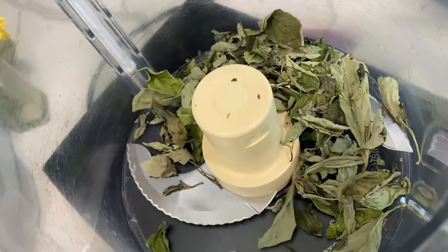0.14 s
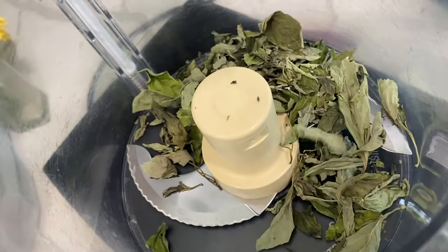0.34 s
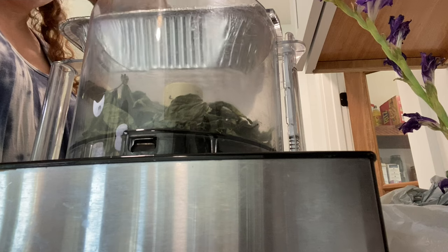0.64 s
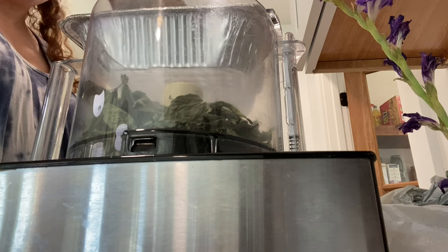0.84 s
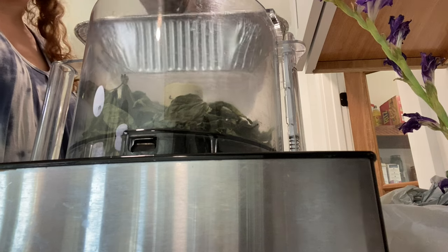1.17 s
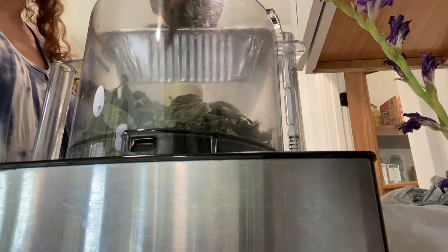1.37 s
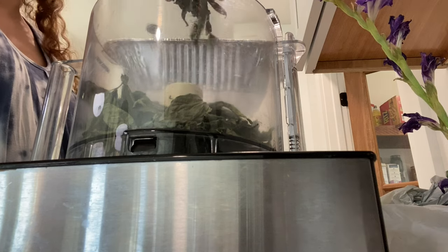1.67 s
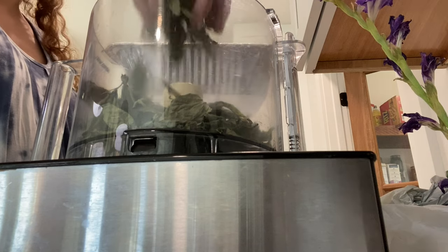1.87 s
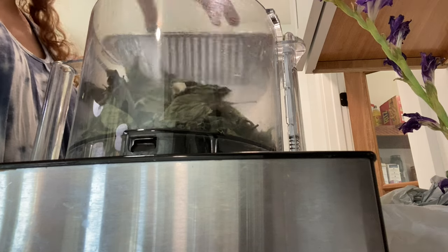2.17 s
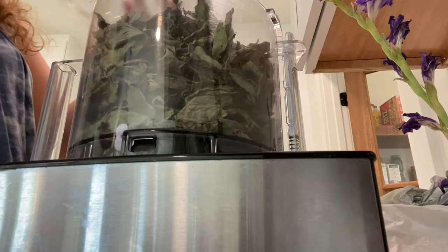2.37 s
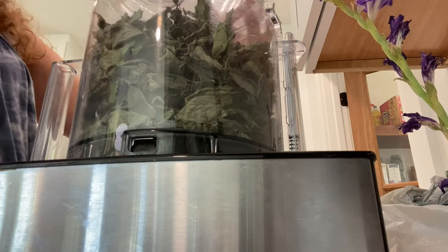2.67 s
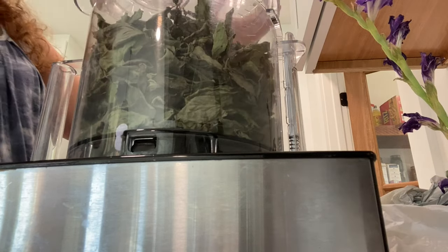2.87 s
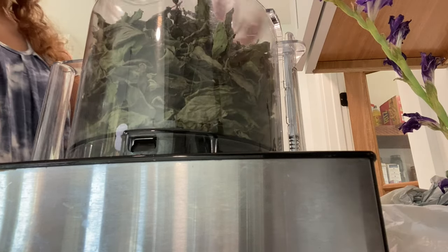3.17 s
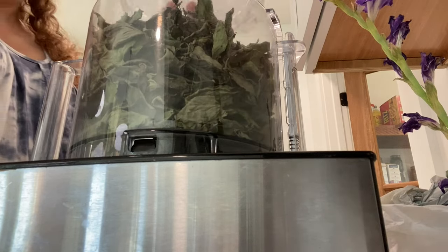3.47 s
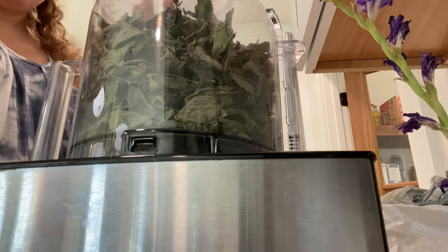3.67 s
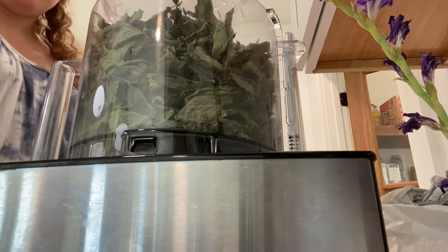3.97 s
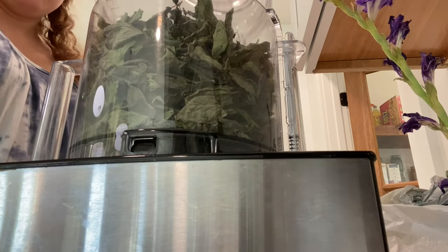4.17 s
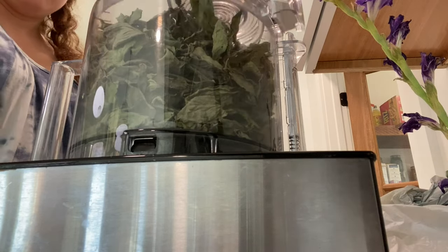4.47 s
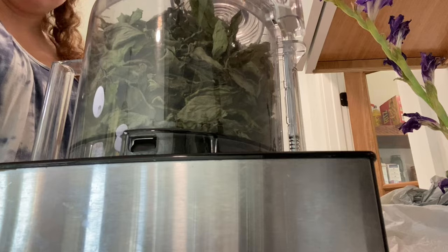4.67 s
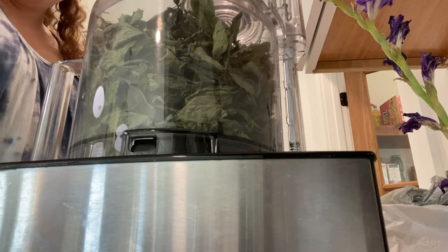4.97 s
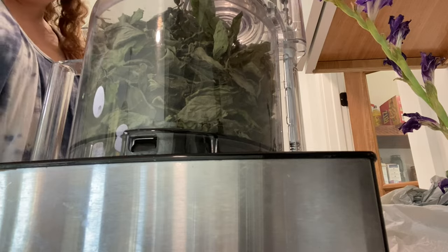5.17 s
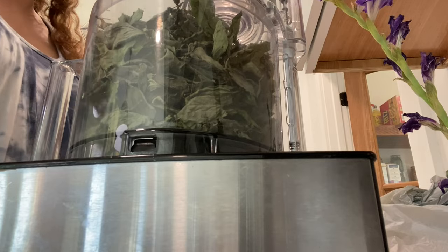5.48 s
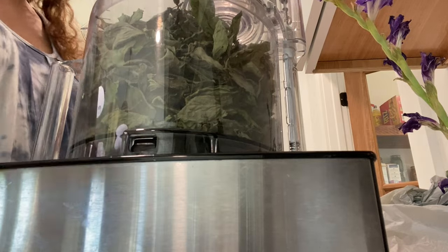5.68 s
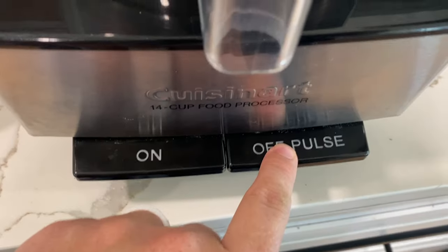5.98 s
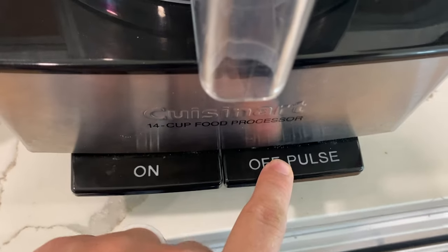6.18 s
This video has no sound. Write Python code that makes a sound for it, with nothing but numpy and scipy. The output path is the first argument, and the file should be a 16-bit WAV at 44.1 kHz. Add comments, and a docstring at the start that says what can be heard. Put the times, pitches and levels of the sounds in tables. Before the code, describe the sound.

Close stereo sound in a kitchen with low rumble and faint hum. Brittle leaves crackle nearby, then slide in several papery rushes from a foil pan into a hollow plastic bowl, with light bumps. The pour stops abruptly. A hand crunches the heap softly while a lid knocks further off. The lid rattles on the rim, snaps shut sharply, rubs briefly, and a button clicks. No motor runs.

```python
"""Close stereo take at a food processor in a kitchen: low rumble, hum and faint hiss; no motor runs.
Dry leaves (bursts of tiny fractures) settle close by, then slide tip by tip from a foil pan into the bowl.
The pouring breaks off abruptly; a hand presses the heap (crunch, ticks, stems), while the lid knocks further off.
The lid grazes the leaves, rattles (struck modes and noise bursts), chatters round the rim and snaps shut.
It rubs on briefly; last, a hand brushes up and clicks a button."""
import sys
import numpy as np
from scipy import signal
from scipy.fft import rfft, irfft
from scipy.io import wavfile
from scipy.ndimage import uniform_filter1d, minimum_filter1d, map_coordinates

SR = 44100
rng = np.random.default_rng(int(sys.argv[2]) if len(sys.argv) > 2 else 0)


def unload_wav(signal):
    """Save mono or channel-first audio to the path in sys.argv[1] as 16-bit WAV at rate SR, clipped to [-1, 1]."""
    wavfile.write(
        sys.argv[1],
        SR,
        np.round(np.clip(np.atleast_2d(signal).T, -1, 1) * 32767).astype(np.int16),
    )


N = 278712
T = np.arange(N) / SR
RING = T[:SR // 4]  # time axis of one blow

# In all tables, levels are relative: each layer is trimmed where it is mixed.
# spectrum of leaves crushed in the heap: (frequency [Hz], density [dB per Hz])
PRESS_COLOUR = [(400, -16), (700, -17.5), (1000, -5), (1400, -8.5), (2300, -9), (2900, -6), (4100, -14),
                (5200, -25.5), (6600, -23.5), (9000, -38), (12000, -71.5)]
# spectrum of a knock on the plastic wall: (frequency [Hz], density [dB per Hz])
WALL_COLOUR = [(200, -37), (600, 2), (850, 5), (1150, 3.5), (1400, -2), (1620, 0), (2200, -0.5), (2600, 1),
               (3400, -5.5), (4300, -15), (5200, -24.5), (8000, -41), (11000, -63)]
# treble loss of the leaf ticks: (frequency [Hz], gain [dB])
LEAF_ROLL_OFF = [(4000, -2.5), (7500, -2), (9500, -12.5), (12000, -57)]
# resonances of the bowl with the leaves in it: (frequency [Hz], width [Hz], lift [dB])
HEAP = [(649, 29, 0.5), (1230, 55, 0), (1460, 28, -3), (1872, 65, -7.5), (2080, 110, -11.5), (2668, 110, 0),
        (3110, 180, -3.5), (3960, 47, -7)]


def undb(db):
    """Decibels to gain."""
    return 10 ** (np.asarray(db) / 20)


def unit(x):
    """Scale to rms 1."""
    return x / np.sqrt(np.mean(x ** 2))


def strength(x):
    """Scale a blow so that its loudest 5 ms have rms 1."""
    power = np.mean(x ** 2, axis=0)
    return x / np.sqrt(uniform_filter1d(power, size=220).max())


def pan(db):
    """Left and right gains for a level difference; positive favours the left."""
    return undb(np.array([[db], [-db]]) / 2)


def add(out, s, sound):
    """Mix a sound in at a time in seconds."""
    start = max(int(s * SR), 0)
    out[:, start:start + sound.shape[1]] += sound[:, :N - start]


def colour(x, points):
    """Causal minimum-phase filter whose gain follows the given (Hz, dB) curve."""
    hz, db = np.transpose(points)
    size = 8192
    bins_hz = np.arange(size // 2 + 1) * SR / size + 1
    log_gain = np.log(undb(np.interp(np.log(bins_hz), np.log(hz), db)))
    # folding the cepstrum onto positive times makes the response causal
    cepstrum = irfft(log_gain)
    cepstrum[1:size // 2] *= 2
    cepstrum[size // 2 + 1:] = 0
    response = irfft(np.exp(rfft(cepstrum)))
    return signal.fftconvolve(x, response[None], axes=1)[:, :x.shape[1]]


def noise(count, alike):
    """White noise at two microphones that share a part of its power (alike, 0 to 1)."""
    shared, own = rng.standard_normal(count), rng.standard_normal((2, count))
    alike = np.clip(alike, 0, 1)
    return np.sqrt(alike) * shared + np.sqrt(1 - alike) * own


def fade(t, t60):
    """Exponential decay by 60 dB in t60 seconds."""
    return np.exp(-np.log(1000) * t / t60)


def ring(modes, rise_s, scatter):
    """Struck modes that swell briefly; each blow weights them anew, phases differ at the two sides."""
    out = 0
    for hz, db, t60 in modes:
        detune, phase, weight, left, right = rng.standard_normal(5)
        side_phase = scatter * (phase + np.array([[left], [right]]) / 2)
        angle = 2 * np.pi * hz * (1 + .003 * detune) * RING + side_phase
        out = out + undb(db + weight) * fade(RING, t60) * np.sin(angle)
    swell = 1 - np.exp(-(RING / rise_s) ** 2)
    return strength(out * swell)


def crack(points, t60, tail_db, tail_t60):
    """A contact: a burst of crowded, quickly dying vibrations with a weaker tail."""
    shape = fade(RING, t60) + undb(tail_db) * fade(RING, tail_t60)
    return strength(colour(noise(len(RING), 0.41) * shape, points))


def grains(rate, spread_db, t60, alike=0.21):
    """Countless tiny fractures, rate per second on average, a few much bigger than the rest."""
    size = undb(spread_db * np.minimum(rng.exponential(size=N), 5))
    power = (rng.random(N) < rate / SR) * size ** 2
    power = signal.lfilter([1], [1, -fade(1 / SR, t60) ** 2], power) + 1e-12
    # dividing by the local mean power (79 ms) leaves the loudness to the movements
    power = power / uniform_filter1d(power, size=3500)
    return np.sqrt(np.abs(power)) * noise(N, alike)


def stroke(start, length, db, sag_db_per_s, attack_s, release_t60):
    """Level of one movement: it builds up, sags (or swells) while it lasts, then dies away."""
    t = np.maximum(T - start, 0)
    level = undb(db - sag_db_per_s * np.minimum(t, length))
    return level * np.minimum(t / attack_s, 1) * fade(np.maximum(t - length, 0), release_t60)


def strokes(table, attack_s, release_t60):
    """Level of a run of movements; their powers sum."""
    return np.sqrt(sum(stroke(*row, attack_s, release_t60) ** 2 for row in table))


def ticks(level, per_s, low_hz, high_hz, t60, spread_db):
    """Separate tiny contacts at random moments, each with its own pitch, size and place."""
    out, t = np.zeros((2, N)), T[:SR // 25]
    for when, pitch, size, side in rng.random((int(per_s * N / SR), 4)):
        hz = min(low_hz * (high_hz / low_hz) ** pitch, SR / 4)
        burst = noise(len(t), 0.48) * fade(t, t60)
        tick = strength(signal.lfilter(*signal.iirpeak(hz, 2, fs=SR), burst))
        gain = level[int(when * N)] * undb(-spread_db * size)
        add(out, when * N / SR, gain * tick * pan(8 * (side - .5)))
    return out


def resonate(x, peaks):
    """Lift the given resonances (Hz, width Hz, dB) out of a sound."""
    return x + sum(undb(db) * signal.lfilter(*signal.iirpeak(hz, hz / width, fs=SR), x)
                   for hz, width, db in peaks)


def from_side(x, lag_s):
    """Sound reaches one microphone late: a positive lag delays the left, a negative the right."""
    late = T[:x.shape[1]]
    lag = np.round(lag_s * SR) / SR
    return np.array([np.interp(late - np.maximum(sign * lag, 0), late, ear, left=0)
                     for sign, ear in zip([1, -1], x)])


def flicker(x, depth_db, hold_s, width_hz):
    """Every fragment rings at its own pitches, so narrow bands flare up and die away independently."""
    size = 1024
    spectra = signal.stft(x, nperseg=size, noverlap=size * 3 // 4)[2]
    field = rng.standard_normal(spectra.shape[1:])
    # smooth the random field along frequency, then along time
    for axis, step in enumerate([SR / size / width_hz, size / 4 / SR / hold_s]):
        for order in range(2):
            field = signal.lfilter([1], [1, -np.exp(-step)], field, axis=axis)
    gain = unit(undb(depth_db * np.clip(unit(field), -2, 2)))
    return signal.istft(spectra * gain, nperseg=size, noverlap=size * 3 // 4)[1][:, :x.shape[1]]


def background():
    """Low kitchen rumble, a mains hum and faint hiss: two coloured noises and a sine."""
    # kitchen loudness: (time [s], level [dB])
    room_level = [(0, -59), (.55, -59.5), (.7, -71), (2.3, -71), (2.55, -67.5), (4.2, -71.5), (5.4, -58.5),
                  (5.8, -61), (6.32, -55.5)]
    # spectrum of the rumble: (frequency [Hz], density [dB per Hz])
    room_colour = [(20, -31), (30, -16), (50, -6), (90, -6), (200, -10), (420, -9), (780, -24.5),
                   (1150, -34), (1800, -30.5), (2800, -41.5), (12000, -56.5), (16000, -78)]
    # spectrum of the hiss: (frequency [Hz], density [dB per Hz])
    hiss_colour = [(100, -1), (1000, 5.5), (3000, -3.5), (5000, -5.5), (9000, -5), (10500, -14.5),
                   (16000, -17)]
    level = undb(np.interp(T, *np.transpose(room_level)))
    hum = undb(-5) * np.sin(2 * np.pi * 59.5 * T)
    rumble = undb(-3.0) * unit(colour(noise(N, 0.13), room_colour))
    hiss = undb(-80.0) * unit(colour(noise(N, 0.091), hiss_colour))
    return level * (rumble + hum) + hiss


def kitchen(x, wet_db, low_t60, mid_t60, high_t60):
    """Hard counters and cupboards return a diffuse tail: noise bands with decays set by pitch."""
    t, tail = T[:SR], 0
    edges = [100, 350, 700, 1500, 3000, 5500, 8000, 15000]  # Hz
    for lo, hi in zip(edges, edges[1:]):
        t60 = np.interp(np.log(lo * hi) / 2, np.log([300, 2000, 9000]), [low_t60, mid_t60, high_t60])
        band = signal.butter(3, [lo, hi], "band", fs=SR, output="sos")
        tail = tail + signal.sosfilt(band, noise(SR, 0.095)) * fade(t, t60)
    tail = tail * (1 - np.exp(-(t / 0.0014) ** 2))
    tail = tail / np.sqrt(np.sum(tail ** 2) / 2)
    surfaces = [(150, 4.0), (450, 0.0), (1000, -1.5), (3000, -3.0), (7000, 1.0), (10000, -6.0)]  # Hz, dB
    return undb(wet_db) * signal.fftconvolve(x, colour(tail, surfaces), axes=1)[:, :N]


def button():
    """A hand brushes up to the button, which takes up its play, then clicks."""
    # spectrum of the click: (frequency [Hz], density [dB per Hz])
    button_colour = [(88, -44), (150, -31), (431, 5.5), (624, -30.5), (960, -12), (1120, -34), (1390, -3.5),
                     (1720, -15.5), (2450, -11.5), (3420, -4.5), (5150, -24.5), (8070, -10.5),
                     (9440, -25.5), (16000, -20)]
    brush_colour = [(300, -19.5), (900, 2), (1400, -9.5), (2000, 4.5), (2600, -12), (6000, -16),
                    (12000, -30.5)]
    brush = unit(colour(grains(900, 1.7, .015), brush_colour))
    out = stroke(5.98, .13, -80.5, -44.5, 0.06, 0.36) * brush  # swells as it nears
    add(out, 6.2888, undb(-45.5) * crack(WALL_COLOUR, 0.11, -21.0, 0.1))  # play
    add(out, 6.293, undb(-33) * crack(button_colour, 0.031, -21, 0.23))  # click
    return out * pan(1.2)


def rocking():
    """Hard blows jolt the whole machine, which rocks on its rubber feet: slow modes at 40 to 70 Hz."""
    # the machine jolted on its feet: (time [s], level [dB])
    jolts = [(4.36, -42.5), (4.47, -39), (4.83, -56), (4.994, -30.5)]
    feet_modes = [(40, -5.5, 0.28), (45, -3.5, 0.42), (70, -4.5, 0.17)]  # Hz, dB, t60 s
    out = np.zeros((2, N))
    for s, db in jolts:
        add(out, s, undb(db) * ring(feet_modes, 0.033, .3))
    return out


def lid_lifted():
    """The loose lid knocks with a hollow note, then grazes the leaves as it is brought over."""
    # the lid knocking as it is picked up: (time [s], level [dB])
    knocks = [(3.076, -51.5), (3.116, -40.5), (3.167, -42.5), (3.178, -24.5)]
    # modes of the loose lid: (frequency [Hz], level [dB], t60 [s])
    loose_lid = [(686, 1, 0.1), (838, 1, 0.075), (930, 1, 0.11), (1052, 2, 0.065), (2779, -13, 0.06)]
    # the lid grazing the leaves: (start [s], length [s], level [dB], sag [dB per s]; negative = swelling)
    graze_move = (3.835, 0.065, -54, -85)
    # resonances of that graze: (frequency [Hz], width [Hz], lift [dB])
    graze_peaks = [(964, 40, 8), (1830, 60, 8), (2120, 60, 10), (2730, 70, 14), (3060, 130, 12),
                   (3500, 200, 7), (3910, 110, 16), (4430, 110, 13)]
    thunk = [(100, -33), (570, -31), (690, -19.5), (900, -7), (1060, -9), (1350, -23), (1800, -21.5),
             (3000, -30.5), (4200, -42.5), (8000, -47.5), (12000, -83)]
    out = np.zeros((2, N))
    for s, db in knocks:
        note = ring(loose_lid, 0.00145, 0.79)
        knock = strength(note + undb(1) * crack(thunk, 0.017, 0, 0.16))
        add(out, s, undb(db - 4.5) * knock)
    graze = unit(resonate(colour(grains(320, 2.4, .008), PRESS_COLOUR), graze_peaks))
    out = out + stroke(*graze_move, 0.02, 0.13) * graze
    return from_side(out, 0.00029) * pan(2.0)


def latch():
    """The tab pings at its catch, snaps past and rings the locked lid, which seats with a dead thump."""
    # modes of the tab, the locked lid and its seat: (frequency [Hz], level [dB], t60 [s])
    tab_modes = [(1460, -0.5, 0.055), (3440, 4.5, 0.079), (4460, -6.5, 0.045), (5420, -12.5, 0.042)]
    catch_modes = [(613, -2, .06), (750, 0, .06), (938, 0, .055), (1134, -4, .045), (1310, 2, .04),
                   (1428, 2, .045), (2190, -3, .04), (2530, -9, .04), (3000, -8, .035), (3350, -2, .025),
                   (3560, -8, .025)]
    seat_modes = [(300, -6, 0.04), (388, 0.5, 0.061), (450, -1.5, 0.021), (506, 6, 0.067), (568, -4, 0.035),
                  (745, -4, 0.022)]
    out = np.zeros((2, N))
    add(out, 4.786, undb(-31) * ring(tab_modes, 0.0005, 1.0) * pan(5))
    add(out, 4.9852, undb(-9.5) * ring(catch_modes, 0.0008, 0.6) * pan(2))
    add(out, 4.9925, undb(-12) * ring(seat_modes, 0.004, 0.25) * pan(-2.5))
    return from_side(out, .00018)


def lid_fitted():
    """Blows tick and ring walls, lid and body, the rim chatters; returns near wall, sound to the room."""
    # the lid striking the bowl:
    # (time [s], wall ring [dB], lid ring [dB], body thud [dB], sharp edge [dB])
    blow_table = [(4.28, -49.5, -54, -27, -58), (4.292, -55, -59.5, -35.5, -72.5),
                  (4.319, -34, -40, -26.5, -54), (4.335, -48, -45.5, -25.5, -76),
                  (4.356, -25.5, -34, -27, -43.5), (4.361, -28.5, -24.5, -14, -50.5),
                  (4.385, -35, -31, -37.5, -54), (4.408, -45.5, -41, -30.5, -66),
                  (4.4375, -27, -28.5, -33, -61), (4.466, -22, -24.5, -19.5, -54.5),
                  (4.469, -26, -18.5, -20.5, -63), (4.567, -39.5, -48.5, -40.5, -63.5),
                  (4.593, -44, -53, -35, -69), (4.6285, -46.5, -51.5, -46.5, -66.5),
                  (4.699, -31.5, -37.5, -35.5, -55.5), (4.706, -41.5, -43.5, -29.5, -64.5),
                  (4.744, -47, -49.5, -40.5, -65), (4.786, -26.5, -37.5, -31, -39),
                  (4.797, -41.5, -34, -29.5, -64), (4.812, -41.5, -38, -30, -65.5),
                  (4.829, -37.5, -34, -23.5, -60.5), (4.838, -37.5, -36, -22.5, -60),
                  (4.853, -43.5, -31.5, -28, -65.5), (4.873, -50, -40.5, -34, -72.5),
                  (4.9648, -32, -41, -32, -52.5), (4.984, -12.5, -34.5, -35, -15),
                  (4.9865, -12, -31, -31, -21), (4.994, -20, -22, -21, -37), (5.282, -59, -35.5, -42, -80),
                  (5.305, -39.5, -47, -36.5, -69), (5.3279, -43, -35.5, -36.5, -75),
                  (5.36, -56, -58, -34, -74.5), (5.3889, -34, -34, -31, -54)]
    # twists of the lid round the rim: (start [s], length [s], level [dB], sag [dB per s])
    twists = [(4.278, 0.1, -42.5, -3.5), (4.36, 0.14, -35, 7.5), (4.56, 0.21, -46, 27.5),
              (4.72, 0.082, -43, -1), (4.785, 0.053, -33, 15), (4.87, 0.18, -46.5, 0),
              (4.97, 0.053, -36.5, 1), (5.12, 0.17, -51.5, -4), (5.26, 0.15, -45.5, 9)]
    # modes of the lid on the rim and of the heavy body: (frequency [Hz], level [dB], t60 [s])
    lid_on_rim = [(700, 0, .075), (765, -1, .06), (985, -6, .085), (1085, -10, .07), (1165, -5, .07),
                  (1890, -16, .06), (2040, -13, .06), (2190, -13, .06), (2460, -17, .05), (2900, -20, .05)]
    body_modes = [(136, -10.5, 0.07), (176, -13, 0.045), (245, -11, 0.05), (332, -2, 0.09), (385, -5, 0.05),
                  (418, -6, 0.05), (461, -2, 0.031), (513, -6.5, 0.031), (690, -10, 0.055)]
    # spectra of the sharp edge and of the rubbing rim: (frequency [Hz], density [dB per Hz])
    edge_colour = [(2000, -15), (3500, 6), (5000, -10), (5700, -7), (6600, -4.5), (7500, -11.5), (8500, -9),
                   (9600, -25.5), (11500, -61), (16000, -80)]
    rub_colour = [(25, -11), (45, 1), (90, -22), (140, 3), (210, -6.5), (270, -6), (350, 3), (450, -0.5),
                  (650, -28), (1000, -22), (1600, -28.5), (3000, -26), (6800, -41.5), (12000, -70)]
    # ringing of the plastic walls and lid: (frequency [Hz], width [Hz], lift [dB])
    plastic = [(514, 36, 10), (611, 30, 11), (754, 38, 6.5), (938, 30, 6.5), (1140, 40, 4), (1309, 45, 7.5),
               (1429, 40, 9.5), (1620, 24, 1), (2040, 50, 4.5), (2207, 55, 6.5), (2529, 30, 2),
               (3000, 45, 4), (3370, 130, 4), (3730, 45, 1.5), (4409, 45, 3), (6500, 300, 4.5),
               (7330, 100, 3)]
    # what all walls together send into the room: (frequency [Hz], gain [dB])
    all_walls = [(250, -0.5), (550, 7), (780, 6.5), (1350, 8.5), (3000, 1.5), (7000, 5), (10000, -2.5)]
    twist = strokes(twists, attack_s=0.019, release_t60=0.19)
    rub = twist * unit(colour(grains(520, 0.96, 0.035), rub_colour)) * undb(-0.5)
    contact, lid, body = np.zeros((3, 2, N))
    for s, wall_db, lid_db, thud_db, edge_db in blow_table:
        add(lid, s, undb(lid_db - 3.5) * ring(lid_on_rim, 0.0015, 0.66))
        add(contact, s, undb(wall_db - 5.5) * crack(WALL_COLOUR, 0.04, -30, 0.11) * pan(2))
        add(contact, s, undb(edge_db - 3.5) * crack(edge_colour, 0.054, -26.0, .1) * pan(6.0))
        add(body, s, undb(thud_db - 3.5) * ring(body_modes, 0.0046, 0.92) * pan(-1.2))
    chatter = colour(ticks(twist, 100, 600, 3600, .012, 12), WALL_COLOUR) * undb(-3.5)
    blows = contact + chatter + flicker(rub, 3, .015, 50)
    ringing = from_side(body, .0005) + from_side(lid, .00028)
    walls = resonate(blows, plastic)
    near = from_side(walls, 0.00017) + ringing
    # the room hears a smoother sum of all walls
    radiated = undb(-1.0) * colour(blows, all_walls) + undb(-11.5) * walls + undb(-1.5) * ringing
    return near, radiated


def settling():
    """Crisp leaves shift in the bowl right under the microphone: slumps of fractures, single cracks."""
    # the heap slumping close by:
    # (start [s], length [s], level [dB], sag [dB per s]; negative = swelling)
    slumps = [(0.0, 0.08, -36, 104), (0.108, 0.077, -45.5, 168), (0.225, 0.088, -62.5, -26),
              (0.34, 0.033, -56, -280), (0.466, 0.058, -53, 132)]
    # single leaves cracking close by: (time [s], level [dB])
    cracks = [(0.0308, -33), (0.1012, -28.5), (0.2702, -48), (0.362, -45.5), (0.4417, -51), (0.468, -43),
              (0.5627, -44)]
    # spectrum of leaves under the microphone: (frequency [Hz], density [dB per Hz])
    settle_colour = [(300, -52), (1200, -15.5), (2500, -9), (4000, -7.5), (7000, -5), (9000, -11.5),
                     (11500, -2.5), (15500, -3)]
    rustle = unit(colour(grains(1200, 1.8, .02), settle_colour))
    out = strokes(slumps, attack_s=0.00065, release_t60=0.11) * rustle * undb(-1.0)
    out = flicker(out, 3, .01, 250)
    for s, db in cracks:
        add(out, s, undb(db - 3.5) * crack(settle_colour, .016, -32, .06))
    return out * pan(2.9)


def pressing():
    """The heap crunches under a hand, then the lid; leaves tick and single stems snap."""
    # a hand, then the lid, pushing on the heap:
    # (start [s], length [s], level [dB], sag [dB per s]; negative = pushing ever harder)
    pushes = [(2.44, 0.23, -66.5, -21), (2.572, 0.037, -55, -67), (2.66, 1, -60, 46),
              (3.08, 0.17, -63.5, -18), (3.28, 0.25, -69, 45), (3.62, 0.27, -67.5, 16),
              (3.81, 0.096, -72, -130), (4.258, 0.027, -51, -4)]
    # stems snapping under the hand: (time [s], level [dB])
    stems = [(2.5266, -35.5), (2.588, -52), (2.623, -49), (2.678, -53), (2.734, -47), (3.117, -37.5),
             (3.193, -38), (3.32, -50.5), (3.59, -50), (3.6663, -46), (3.738, -58), (3.822, -59),
             (3.859, -58)]
    push = strokes(pushes, attack_s=0.012, release_t60=0.13)
    out = push * unit(colour(grains(900, 1.9, .02), PRESS_COLOUR)) * undb(-3)
    out = out + colour(ticks(push, 60, 1200, 6000, .014, 12), LEAF_ROLL_OFF) * undb(3)
    for s, db in stems:
        add(out, s, undb(db - 10.5) * crack(PRESS_COLOUR, 0.032, -14, 0.11))
    out = flicker(resonate(out, HEAP), 4, .016, 70)
    return out * pan(4.0)


def pour_levels():
    """Each tip of the pan sends down leaves, stirs the air and sheds flakes, all with one envelope."""
    # tips of the pan: (start [s], length [s], level [dB], sag [dB per s],
    # bowl air [dB], fine flakes [dB]), the last two relative to the level
    tips = [(0.57, 0.12, -39.5, -8, 6.5, -9.5), (0.708, 0.35, -45, 2, 6, -8.5),
            (1.106, 0.43, -53.5, 3, 9, -3.5), (1.559, 0.14, -55, 35, 7, -2.5),
            (1.74, 0.42, -75, -21, -7, 8.5), (1.961, 0.28, -54.5, 27, -1.5, -1.5),
            (2.287, 0.2, -54.5, 27, -12, -7.5)]
    attack_s, release_t60 = 0.024, 0.32
    power = 0
    for start, length, db, sag, air_db, flake_db in tips:
        envelope = stroke(start, length, db, sag, attack_s, release_t60)
        power = power + np.outer(undb([0, air_db, flake_db]), envelope) ** 2
    return np.sqrt(power)


def pouring():
    """Leaves scrape and tick down the foil and stir the air in the bowl; the pan bumps the rim."""
    # clumps of leaves dropping into the bowl: (time [s], level [dB], fine flakes [dB])
    clumps = [(0.582, -53, -62), (0.604, -41, -60), (0.623, -34.5, -78), (0.69, -56, -44),
              (0.819, -37.5, -60), (0.875, -59, -63), (1.006, -50, -43.5), (1.141, -44.5, -69),
              (1.321, -63, -69), (1.411, -50.5, -65), (1.455, -50, -71), (1.573, -45.5, -58),
              (1.595, -43, -55), (1.617, -45, -56), (1.671, -42.5, -62), (1.69, -58, -55),
              (1.823, -54, -48), (1.881, -55.5, -50), (1.888, -55, -62), (1.935, -71, -47.5),
              (1.989, -56, -39), (2.013, -47, -49)]
    # the pan bumping the bowl: (time [s], level [dB], pitch [ratio])
    bumps = [(0.59, -37, 0.86), (0.618, -37, 1), (0.684, -45.5, 1.06), (0.718, -42, 0.98),
             (0.828, -48.5, 0.93), (0.87, -48.5, 0.91), (1.004, -35, 0.99), (1.045, -43, 0.96),
             (1.32, -47, .96), (1.373, -44, 1.05), (1.452, -46, 1.03), (1.573, -42.5, 1), (1.67, -46, 1),
             (1.986, -43.5, 1.02), (2.051, -51, 1.08), (2.177, -54, 0.91), (2.209, -54, 0.83),
             (2.336, -24, .98), (2.357, -33, 0.92), (2.399, -40, 1.1), (2.426, -39.5, 1.03)]
    # spectra of the sliding leaves and of the fine flakes: (frequency [Hz], density [dB per Hz])
    pour_colour = [(250, -31), (500, -7.5), (700, -8), (900, 2), (1220, 3), (1650, -5), (2050, -2),
                   (2400, -5.5), (3100, 0), (4100, -8), (5100, -22.5), (6500, -11), (9000, -30.5),
                   (12000, -62)]
    flake_colour = [(2500, -20), (4400, -13), (5200, -25.5), (6600, -11.5), (8300, -15.5), (9700, -22),
                    (11500, -40.5), (16000, -69)]
    # resonances of the open bowl, before the pitch ratio: (frequency [Hz], width [Hz], level [dB])
    hollow_peaks = [(385, 70, -4), (480, 75, 4), (665, 80, 0)]
    # the hollow note rises as the pan sinks into the bowl, then falls back a little:
    # (time [s], pitch [ratio])
    hollow_rise = [(0.6, 0.94), (1.1, 1.12), (1.7, 1.04)]
    # modes of the air in the bowl, before the pitch ratio: (frequency [Hz], level [dB], t60 [s])
    bowl_air = [(170, 1, 0.023), (430, 14, 0.02), (492, 20, 0.03), (545, 11, 0.024), (650, 4, 0.042)]
    # the pan crosses over the bowl: (time [s], lag at the left microphone [s])
    pan_place = [(1.5, .00047), (1.57, -.00064)]
    flow, air, flakes = pour_levels()

    stir = grains(300, 2.5, .008, alike=.8)
    hollow = sum(undb(db) * signal.lfilter(*signal.iirpeak(hz, hz / width, fs=SR), stir)
                 for hz, width, db in hollow_peaks)
    hollow = signal.sosfilt(signal.butter(2, [330, 900], "band", fs=SR, output="sos"), hollow)
    # reading it at a varying speed bends its pitch
    place = np.cumsum(np.interp(T, *np.transpose(hollow_rise)))
    hollow = np.array([map_coordinates(ear, [place], order=1, mode="mirror") for ear in hollow])

    out = undb(-0.5) * flow * unit(colour(grains(850, 2.3, .008, alike=.5), pour_colour))
    out = out + undb(-0.5) * flakes * unit(colour(grains(2000, 0.95, 0.026), flake_colour))
    out = out + colour(ticks(flow, 110, 750, 7000, .013, 10), LEAF_ROLL_OFF) * undb(5.5)
    for s, db, flake_db in clumps:
        add(out, s, undb(db + 1.5) * crack(pour_colour, .07, -25, .15))
        add(out, s, undb(flake_db - 4.5) * crack(flake_colour, 0.21, -25, 0.2))
    out = undb(-5.0) * resonate(out, HEAP)
    out = out + kitchen(out, -0.89, 0.081, 0.36, 0.24) + undb(-9.5) * air * unit(hollow)
    out = flicker(out, 2.8, .014, 65)

    rim = np.zeros((2, N))
    for s, db, pitch in bumps:
        note = ring([(hz * pitch, mode_db, t60) for hz, mode_db, t60 in bowl_air], 0.009, 0.2)
        knock = undb(-13.0) * crack(WALL_COLOUR, 0.053, -18, 0.11)
        add(rim, s, undb(db - 2.0) * (note + knock))
    return from_side(out + rim, np.interp(T, *np.transpose(pan_place)))


def scene():
    """Things on the machine are close; the lid is picked up further off; the kitchen answers."""
    close = settling() + button()
    lid, radiated = lid_fitted()
    machine = latch() + rocking()
    far = lid_lifted() + pressing()
    into_room = undb(2.5) * close + radiated + machine + undb(0.5) * far
    echo = kitchen(into_room, -15.5, 0.47, 0.76, 0.51)
    # the pouring breaks off abruptly, echo and all
    leaves = pouring() * np.interp(T, [2.450, 2.456], [1, 0])
    return close + lid + machine + far + leaves + echo + background()


def record(dry):
    """The recorder eases its gain down around peaks above 0.95 and cuts the top above 15.9 kHz."""
    headroom = .95 / np.maximum(np.abs(dry).max(axis=0), .95)
    gain = minimum_filter1d(headroom, size=201)
    gain = uniform_filter1d(uniform_filter1d(gain, size=100), size=100)
    top_cut = signal.ellip(8, .2, 70, 15900, fs=SR, output="sos")
    return signal.sosfilt(top_cut, dry * gain)


dry = scene()
out = record(dry)
unload_wav(out)
```